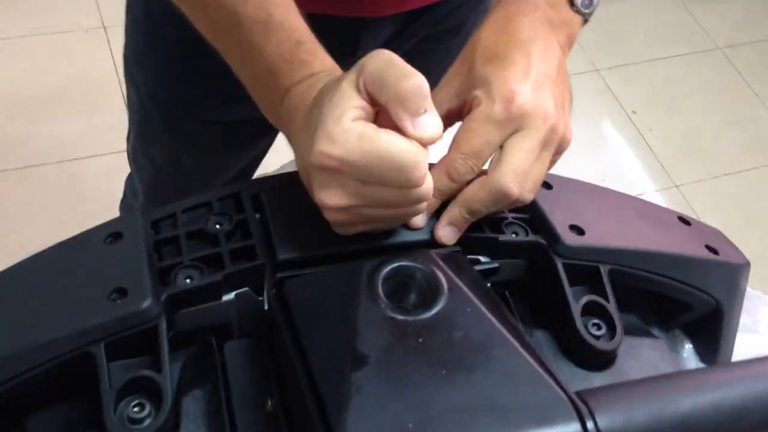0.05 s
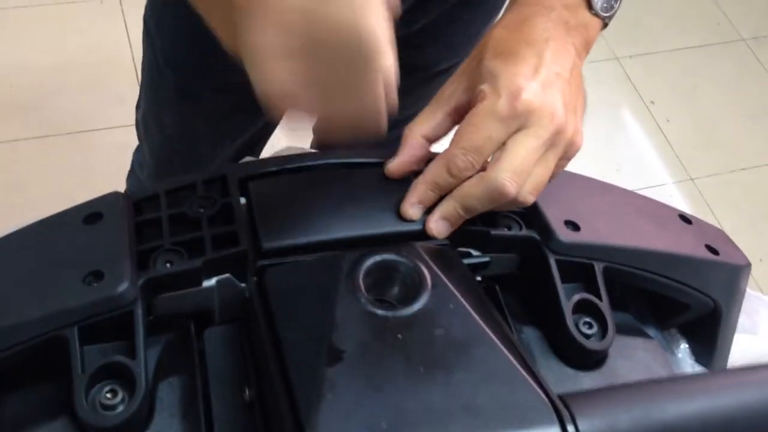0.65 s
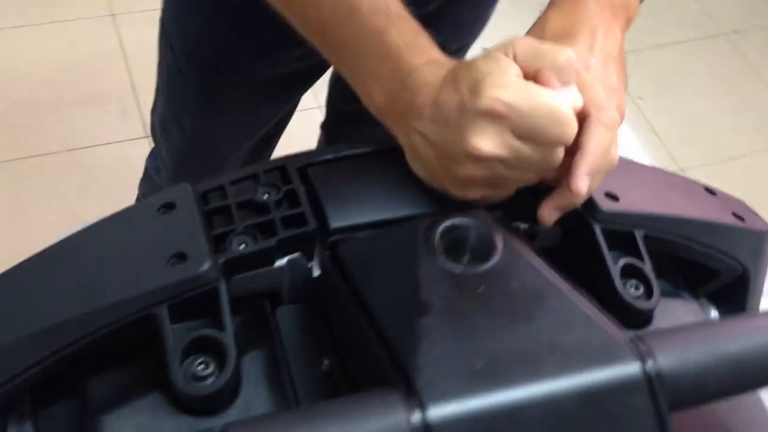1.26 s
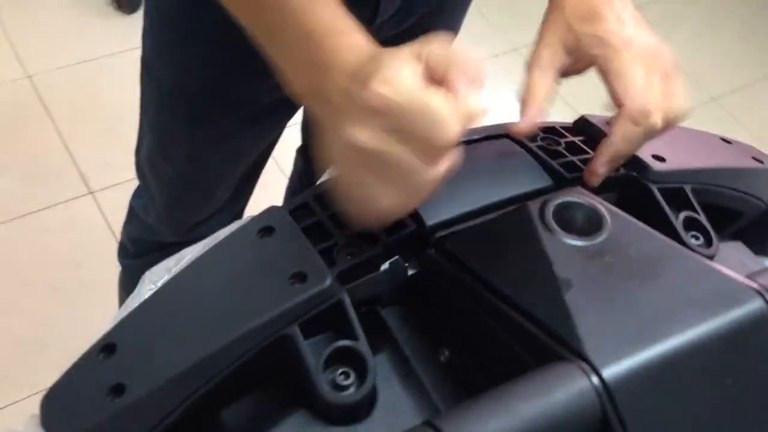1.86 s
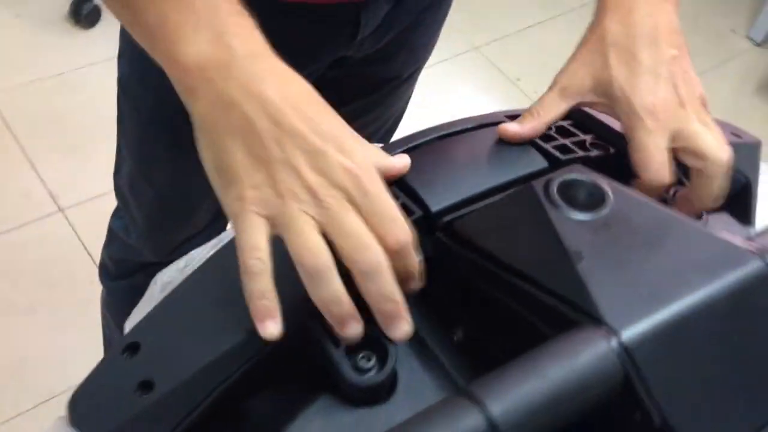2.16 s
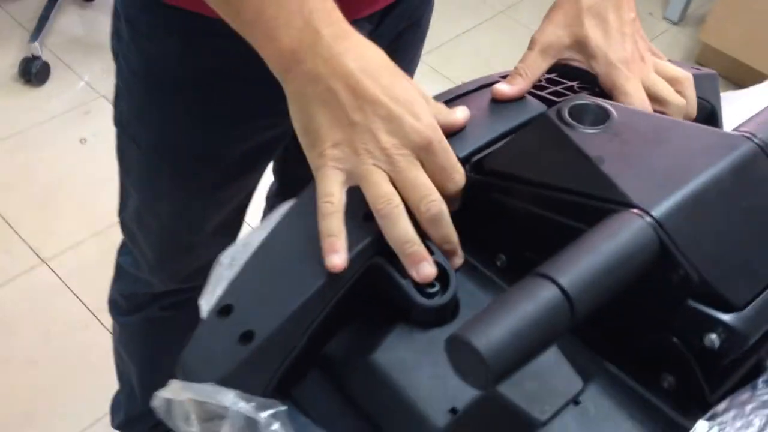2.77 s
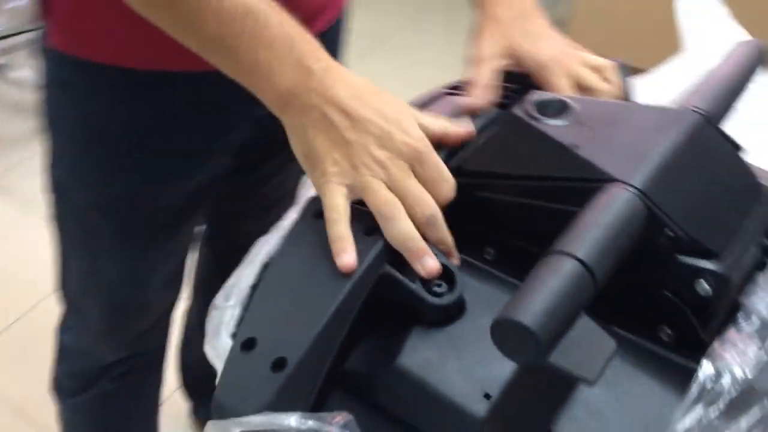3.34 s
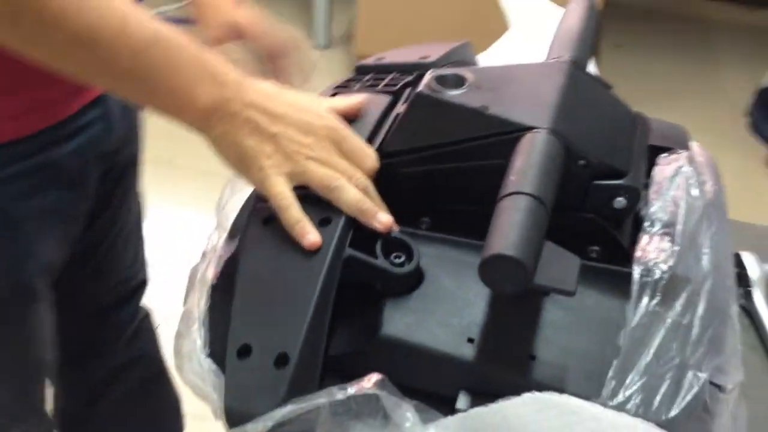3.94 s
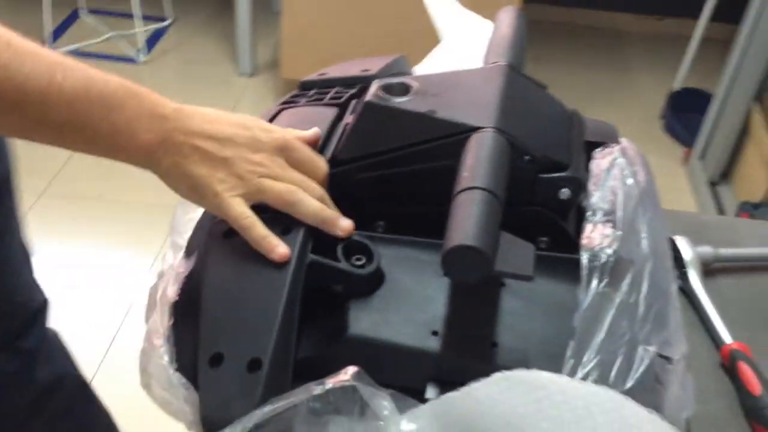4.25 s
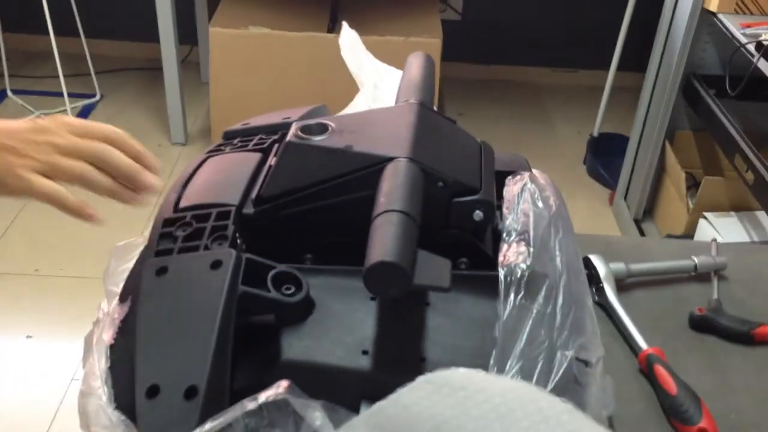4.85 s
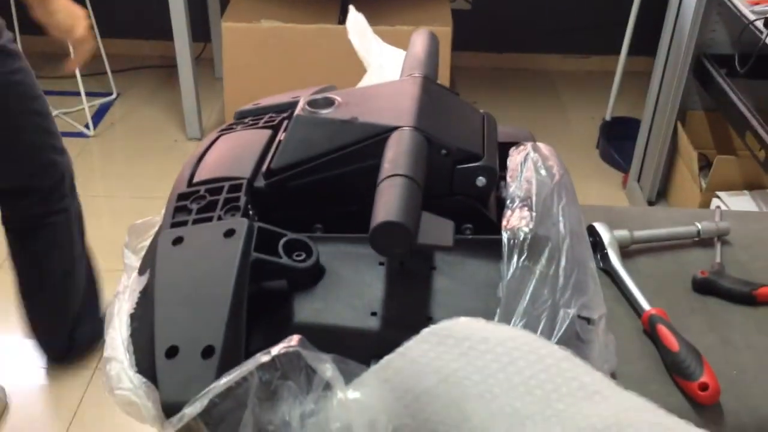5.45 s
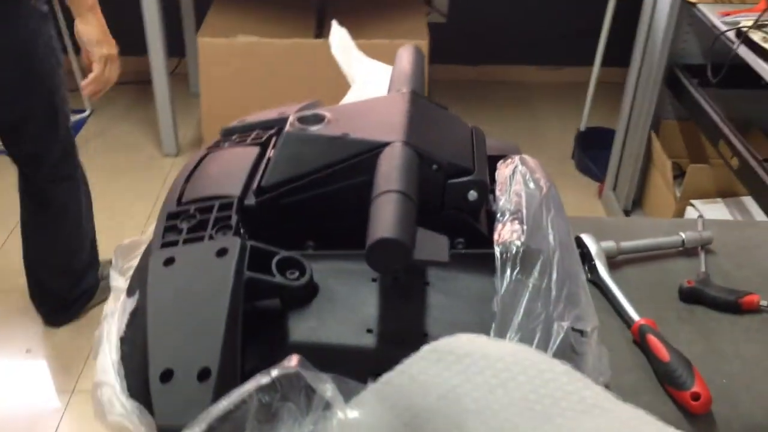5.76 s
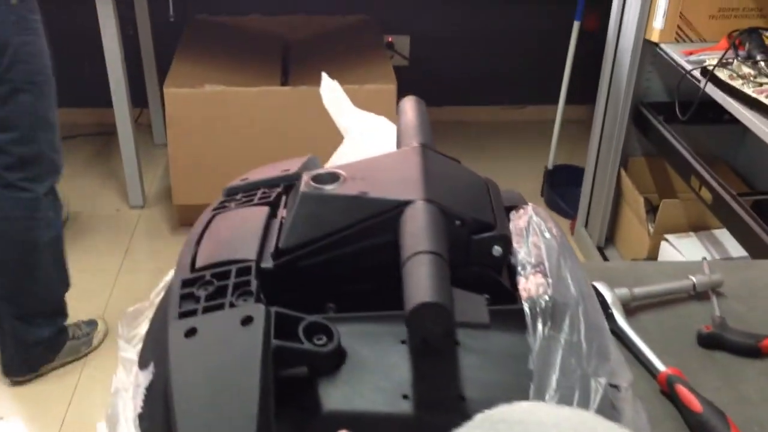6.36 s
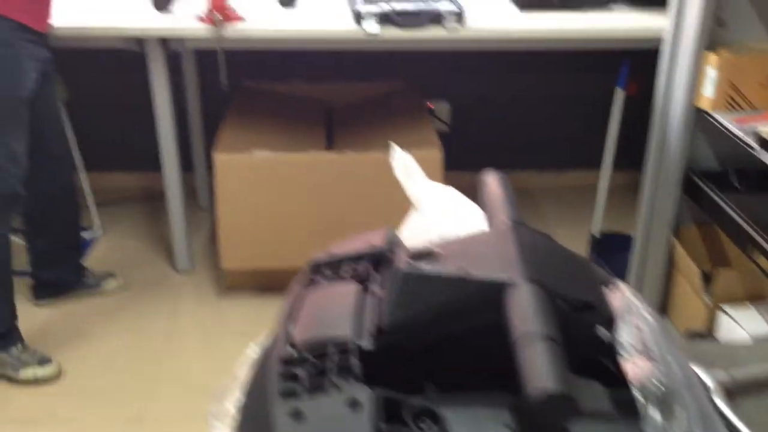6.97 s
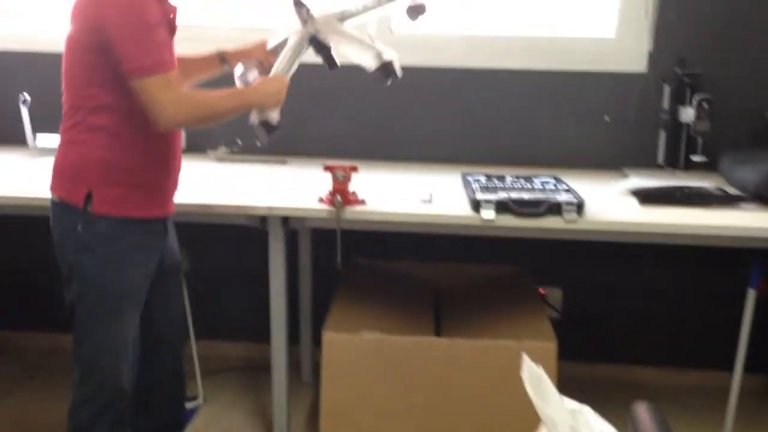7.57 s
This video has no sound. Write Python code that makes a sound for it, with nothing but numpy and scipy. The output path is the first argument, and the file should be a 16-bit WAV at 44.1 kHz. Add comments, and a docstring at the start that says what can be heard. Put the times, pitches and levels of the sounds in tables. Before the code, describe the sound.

Four sharp, booming blows on plastic ring briefly in a room, then quiet brushing, small bumps and light clinks.

```python
"""Thumping a chair cover into place

A fist thumps a plastic cover into the underside of an office chair four times, in a tiled workshop.
Each blow cracks the cover against its seat and makes the hollow chair shell boom; the room rings on.
Then hands brush the plastic, and the worker walks off with rustling clothes
and drags a chair base off a bench."""
import sys
import numpy as np
from scipy import signal
from scipy.fft import rfft, irfft, next_fast_len
from scipy.io import wavfile
from scipy.ndimage import uniform_filter1d

SR = 44100
rng = np.random.default_rng(int(sys.argv[2]) if len(sys.argv) > 2 else 0)


def wav_record(signal):
    """Record a signal, one row per channel, as 16-bit PCM in the file named by sys.argv[1]."""
    frames = np.transpose(np.atleast_2d(signal))
    bounded = np.clip(frames, -1, 1)
    # unit amplitude maps onto the largest positive 16-bit level
    quanta = np.round(bounded * 32767).astype(np.int16)
    wavfile.write(sys.argv[1], SR, quanta)


N = 335601
TIME = np.arange(N) / SR
HIT_TIME = TIME[:2 ** 14]  # a short clock for one hit [s]
# the slap of skin and plastic edges: (frequency [Hz], level [dB])
SLAP_COLOUR = [(100, -6.5), (250, -2.5), (450, -2), (700, -12), (1000, -1.5), (2000, 2), (3000, 3.5),
               (5000, 0), (7500, -5), (11000, -8), (15000, -16)]


def from_db(db):
    """Turn decibels into a number to multiply a sound by."""
    return 10 ** (np.asarray(db) / 20)


def fade(t, t60):
    """Die away smoothly; the fade time t60 is the seconds it takes to drop 60 dB."""
    return np.exp(-np.minimum(np.log(1000) * t / t60, 60))


def at_hz(points, hz):
    """Look up a frequency in a table, blending between rows on a scale of octaves."""
    row_hz, values = np.transpose(points)
    return np.interp(np.log(np.maximum(hz, 1)), np.log(row_hz), values)


def frequencies(x):
    """The frequencies in the spectrum of x."""
    return np.fft.rfftfreq(len(x), 1 / SR)


def colour(x, points):
    """Turn the lows and highs of x up or down, following (frequency [Hz], level [dB]) points."""
    padded = np.pad(x, (0, next_fast_len(len(x) + len(HIT_TIME)) - len(x)))
    gains = from_db(at_hz(points, frequencies(padded)))
    return irfft(rfft(padded) * gains, len(padded))[:len(x)]


def add(out, s, sound):
    """Mix a sound in at s seconds."""
    start = max(round(s * SR), 0)
    out[start:start + len(sound)] += sound[:len(out) - start]


def noise(points):
    """Steady noise with the given colour and an average (rms) size of 1."""
    x = colour(rng.standard_normal(N), points)
    return x / x.std()


def chatter(t60, passes=4):
    """Two things meet in a dying burst of tiny impacts that holds all frequencies evenly."""
    burst = rng.standard_normal(len(HIT_TIME)) * fade(HIT_TIME, t60)
    window = 1 / (1 + (HIT_TIME / t60) ** 4)
    for _ in range(passes):
        spectrum = rfft(burst)
        evened = spectrum / (np.abs(spectrum) + 1e-12)
        burst = irfft(evened, len(HIT_TIME)) * window  # keep it short
    return burst / np.sqrt(np.sum(burst ** 2)) * np.sqrt(SR / 5)


def contact(db, hz, octaves, t60):
    """A brief contact that sounds in one band around hz."""
    edges = np.clip([hz / 2 ** (octaves / 2), hz * 2 ** (octaves / 2)], 20, .45 * SR)
    band = signal.butter(2, edges, "band", fs=SR, output="sos")
    return from_db(db) * signal.sosfilt(band, chatter(t60))


def rubbing(strength, spectrum, grain_db, grains_per_s=150):
    """A hiss that flickers as two surfaces catch and slip."""
    grip = np.interp(TIME * grains_per_s, np.arange(N), rng.standard_normal(N))
    return strength * from_db(grain_db * grip) * noise(spectrum)


def room_noise(level_db=-61):
    """The faint, low, steady rush of the room."""
    # colour of the rush: (frequency [Hz], level [dB])
    air_colour = [(20, -20.5), (32, -13), (50, -0.5), (100, -2), (130, -5), (200, -4), (280, -9.5),
                  (350, -10), (480, -14.5), (800, -16), (1250, -17.5), (1900, -17.5), (3300, -20.5),
                  (5000, -21.5), (8000, -25.5), (15000, -28.5)]
    return from_db(level_db) * noise(air_colour)


def workshop_echo(x, build_s=0.003, bands=16):
    """Echoes from the tiles build up quickly, blur together and die sooner in the treble."""
    # how long the room rings: (frequency [Hz], fade time [s])
    fade_times = [(100, .56), (260, .57), (700, .55), (1200, .58), (1950, .63), (4850, .55), (8000, .41),
                  (13000, .33)]
    # colour of the echoes: (frequency [Hz], level [dB])
    echo_colour = [(100, -1), (300, 3), (700, 4), (1500, 0.5), (2300, -4.3), (2900, 0.5), (4000, -0.5),
                   (7000, -4), (14000, -6.5)]
    t = TIME[:SR]
    white = rfft(rng.standard_normal(SR))
    centres = np.geomspace(60, 16000, bands)
    tail = 0
    for hz, share in zip(centres, np.eye(bands)):
        band_gains = at_hz(list(zip(centres, share)), frequencies(t))
        tail = tail + irfft(white * band_gains, SR) * fade(t, at_hz(fade_times, hz))
    tail *= 1 - np.exp(-(t / build_s) ** 2)
    tail /= np.sqrt(np.sum(tail ** 2))
    return signal.fftconvolve(x, colour(tail, echo_colour))[:N]


def clothes(attack_s=.06, settle_db=4.2):
    """Cloth rustles through each move, then drops by settle_db for each further length of that move."""
    # the worker's moves: (start [s], level [dB], length [s])
    moves = [(4.41, -63.5, .48), (7.43, -67, .07)]
    # the rustle of cloth: (frequency [Hz], level [dB])
    cloth_colour = [(300, -12.5), (1000, -6.5), (2300, -0.5), (3800, 2), (6500, -5.5), (10000, -12),
                    (15000, -21.5)]
    strength = 0
    for s, db, length in moves:
        attack = np.clip((TIME - s) / attack_s, 0, 1)
        settling = np.maximum((TIME - s) / length - 1, 0)
        strength = strength + attack * from_db(db - settle_db * settling)
    return rubbing(strength, cloth_colour, grain_db=0.5)


def palms():
    """A palm speeds up and slows down on the plastic, so its hiss swells and sinks."""
    # strokes of the palm: (middle [s], level [dB], length [s])
    strokes = [(2.69, -66.5, .15), (3.04, -65, .06), (3.26, -66, .12), (3.455, -60, .08), (3.75, -65, .19),
               (4.02, -69, .12)]
    # the hiss of skin on plastic: (frequency [Hz], level [dB])
    brush_colour = [(300, -18), (900, -7), (1300, -2), (2500, 2), (5000, 2.5), (9000, -3), (15000, -6)]
    strength = sum(from_db(db) * np.exp(-2 * ((TIME - s) / length) ** 2) for s, db, length in strokes)
    return rubbing(strength, brush_colour, grain_db=1.0)


def pings():
    """Lightly touched parts ring on single thin notes."""
    # the notes: (time [s], pitch [Hz], level [dB], fade time [s])
    notes = [(2.66, 3150, -70, 2.8), (7.199, 4727, -57, 0.26), (7.199, 4274, -70, 0.45)]
    out, t = np.zeros(N), TIME[:SR]
    for s, hz, db, t60 in notes:
        add(out, s, from_db(db) * np.sin(2 * np.pi * hz * t) * fade(t, t60))
    return out


def chair_base(rise_db_per_s=58, fall_db_per_s=75, hold_s=.07):
    """The scrape on the bench grows as each pull gathers speed, holds briefly and runs out."""
    # pulls on the base: (time of top speed [s], level [dB])
    pulls = [(7.035, -52), (7.53, -68)]
    # the scrape: (frequency [Hz], level [dB])
    scrape_colour = [(150, -18), (400, -11), (750, -7), (1150, -4.5), (1750, 2.5), (2700, -0.5), (4200, -2),
                     (7000, -8.5), (15000, -15)]
    strength = 0
    for s, db in pulls:
        before = np.maximum(s - hold_s / 2 - TIME, 0)
        after = np.maximum(TIME - s - hold_s / 2, 0)
        strength = strength + from_db(db - rise_db_per_s * before - fall_db_per_s * after)
    return rubbing(strength, scrape_colour, grain_db=-0.3)


def small_contacts(bump_hz=74, bump_octaves=1.6, bump_t60=.13, bump_room_db=-9):
    """Parts, hands and feet make brief noises; returns the direct sound and what goes into the room."""
    # small knocks and clacks of parts, a graze of the fist, a short rub and footsteps:
    # (time [s], level [dB], centre [Hz], width [octaves], fade time [s], share sent to the room [dB])
    contacts = [(0.41, -44, 2550, 0.7, 0.09, -9.5), (0.587, -33, 2200, .35, 0.057, -2),
                (1.6962, -34, 3500, 1.7, 0.047, -6.5), (3.42, -61, 1350, .6, .28, 3),
                (4.575, -65, 548, 1.2, .08, 4), (5.325, -61, 1500, 1.1, .09, -3.5),
                (6.493, -57.5, 650, 2.8, .14, -1), (6.777, -60, 1200, 1.5, 0.036, 0.5),
                (7.06, -47, 1600, 1.2, 0.085, -11), (7.078, -52.5, 280, 1.0, .12, 3),
                (7.199, -53, 4800, .14, .12, -4), (7.2, -62, 720, .2, .3, 3)]
    # dull bumps of steps and handling: (time [s], level [dB])
    bumps = [(2.76, -54), (3.32, -53), (3.62, -49.5), (3.69, -50), (4.18, -50), (5.35, -49), (5.69, -52),
             (6.37, -49)]
    low_contacts = [(s, db, bump_hz, bump_octaves, bump_t60, bump_room_db) for s, db in bumps]
    direct, to_room = np.zeros((2, N))
    for s, db, hz, octaves, t60, room_db in contacts + low_contacts:
        sound = contact(db, hz, octaves, t60)
        add(direct, s, sound)
        add(to_room, s, from_db(room_db) * sound)
    return direct, to_room


def shell_boom(rise_s=0.0081, shudder_db=1, shudder_t60=.16):
    """The soft fist pushes for a moment, so the shell's boom swells; loose panels shudder along."""
    # notes of the hollow chair shell: (pitch [Hz], level [dB], fade time [s])
    notes = [(60, -6, .13), (137.9, 5.3, 0.115), (131, -23.5, .56), (139, -22.5, .48), (178, -8, .2),
             (220.3, -8, 0.078), (258, -14, .14)]
    # the shudder of loosely screwed panels: (frequency [Hz], level [dB])
    shudder_colour = [(25, -10), (55, 1), (95, -16), (180, -2.5), (255, -5), (320, -17.5), (480, -10),
                      (800, -24), (3000, -44), (9000, -64.5)]
    push = 1 - np.exp(-(HIT_TIME / rise_s) ** 2)
    ring = sum(from_db(db) * np.sin(2 * np.pi * hz * HIT_TIME) * fade(HIT_TIME, t60)
               for hz, db, t60 in notes)
    shudder = from_db(shudder_db) * colour(chatter(shudder_t60), shudder_colour)
    return push * ring + shudder


def cover_ring(notes, rise_cycles=0.75, rise_s=.0005):
    """The cover rings; low notes travel through it more slowly, so they swell later than high ones."""
    out = 0
    for k, (hz, t60, db) in enumerate(notes):
        swell = 1 - np.exp(-HIT_TIME / (rise_s + rise_cycles / hz))
        tone = (-1) ** k * np.sin(2 * np.pi * hz * HIT_TIME)  # every other note is flipped
        out = out + from_db(db) * swell * tone * fade(HIT_TIME, t60)
    return out


def crack_into_room(notes, slap_db, width_hz=130, notes_db=-3.3):
    """Taken over all directions, the cover's notes and the slap add up in power and never cancel."""
    hz = np.geomspace(50, 16000, 400)
    power = from_db(slap_db + at_hz(SLAP_COLOUR, hz)) ** 2
    for centre, _, db in notes:
        power = power + from_db(db + notes_db) ** 2 / (1 + ((hz - centre) / width_hz) ** 2) ** 2
    crack_colour = np.column_stack([hz, 10 * np.log10(power)])
    return colour(chatter(t60=.035), crack_colour)


def fist(ring_db=2, boom_lag_s=.0028, boom_room_db=-12.3):
    """Each blow touches the cover, slams it home and shakes the shell; returns (direct, to room)."""
    # the blows: (time [s], first touch [dB], wait until the slam [s], slam [dB], slam fade time [s],
    # boom [dB], share of the crack sent to the room [dB])
    blows = [(0.43, -26, .0036, -21, 0.02, -33, -8.5), (0.8474, -42.5, .0030, -28.5, 0.026, -14, -7.5),
             (1.2413, -38.5, .0030, -26, .022, -15, -6), (1.6698, -35, .0016, -28.5, 0.023, -10.5, -6.5)]
    # notes of the cover; each blow lands on another spot and so brings out another mix of them:
    # (pitch [Hz], fade time [s], level in blow 1 [dB], in blow 2 [dB], in blow 3 [dB], in blow 4 [dB])
    cover_notes = [(490, .028, -11.5, -26, -19, -17), (925, .035, -27.5, -23.5, -14.5, -18),
                   (1187, .035, -25, -12, -11, -11.5), (1507, .035, -16.5, -17, -8.5, -27.5),
                   (1730, .03, -14, -18.5, -18, -19), (2000, 0.037, -4, -15, -8.5, -13),
                   (2235, .03, -4, -17.5, -31, -8), (2440, .03, -11.5, -15.5, -12, -10.5),
                   (2765, 0.04, -3, -27, -18, -19), (3540, .028, -22, -26, -17, -19),
                   (4160, 0.04, -13, -30.5, -28, -25.5), (4640, .028, -15.5, -24.5, -19.5, -28),
                   (5525, 0.037, -22, -15.5, -45, -28.5), (6100, 0.035, -15, -24, -25, -18)]
    direct, to_room = np.zeros((2, N))
    for k, (s, touch_db, wait_s, slam_db, slam_t60, boom_db, room_db) in enumerate(blows):
        notes = [(hz, t60, levels[k]) for hz, t60, *levels in cover_notes]
        slam_s = s + wait_s
        add(direct, s, from_db(touch_db) * colour(chatter(t60=.02), SLAP_COLOUR))
        add(direct, slam_s, from_db(slam_db) * colour(chatter(slam_t60), SLAP_COLOUR))
        # the harder the first touch, the sooner the cover starts to ring
        head_start_s = wait_s * min(from_db(touch_db - slam_db) * 1.5, 1)
        add(direct, slam_s - head_start_s, from_db(ring_db) * cover_ring(notes))
        add(to_room, slam_s, from_db(room_db) * crack_into_room(notes, slam_db))
        boom = from_db(boom_db) * shell_boom()
        add(direct, slam_s + boom_lag_s, boom)
        add(to_room, slam_s + boom_lag_s, from_db(boom_room_db) * boom)
    return direct, to_room


def scene(scrape_room_db=-5):
    """Nearby blows and handling, the bench farther off, and the room around them."""
    blows, blows_to_room = fist()
    contacts, contacts_to_room = small_contacts()
    handling = palms() + clothes()
    scrape = chair_base()
    echo = workshop_echo(blows_to_room + contacts_to_room + from_db(scrape_room_db) * scrape)
    return (blows + contacts + handling + scrape + pings() + echo + room_noise())[None]


def gain_control(x, threshold_db=-26, slope=0.39, attack_s=.006, recovery_db_per_s=7):
    """Loud sounds turn the volume down; it creeps back up afterwards."""
    power = uniform_filter1d(x ** 2, size=256)
    level_db = 10 * np.log10(np.maximum(power, 1e-12))
    cut_db = slope * np.maximum(level_db - threshold_db, 0)
    recovery_db = recovery_db_per_s * TIME
    held_db = np.maximum.accumulate(cut_db + recovery_db) - recovery_db
    smoothing = np.exp(-1 / (attack_s * SR))
    smooth_db = signal.lfilter([1 - smoothing], [1, -smoothing], held_db)
    return x * from_db(-smooth_db)


def record(dry, ceiling=.9, cutoff_hz=15300):
    """The microphone colours the sound, turns loud parts down, rounds peaks and cuts the top treble."""
    # its equaliser trims the deepest bass and scoops out a narrow band: (frequency [Hz], level [dB])
    mic_colour = [(15, -16), (35, 0), (2550, 1), (2720, -3), (2920, -1.5), (3100, 0)]
    levelled = gain_control(colour(dry[0], mic_colour))
    rounded = ceiling * np.tanh(levelled / ceiling)
    treble_cut = signal.ellip(12, .1, 80, cutoff_hz, fs=SR, output="sos")
    return signal.sosfilt(treble_cut, rounded)[None]


dry = scene()
out = record(dry)
wav_record(out)
```